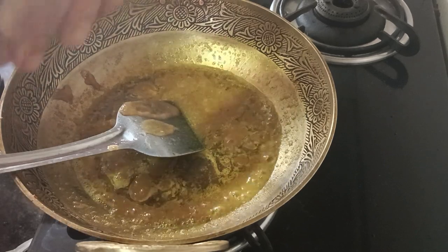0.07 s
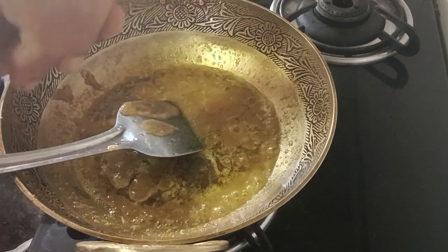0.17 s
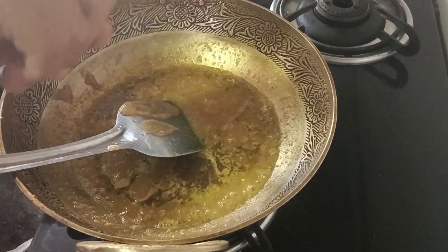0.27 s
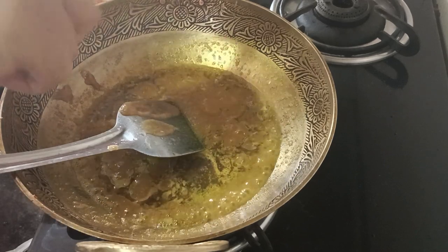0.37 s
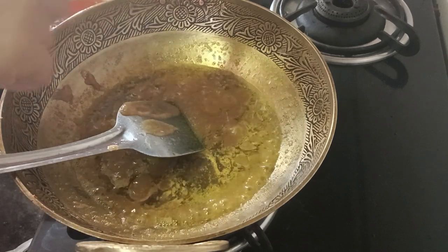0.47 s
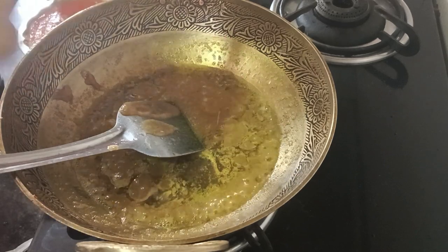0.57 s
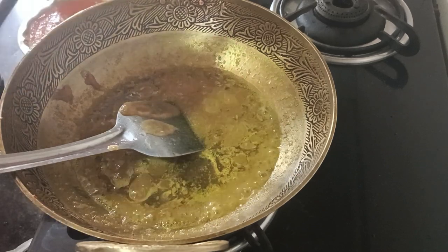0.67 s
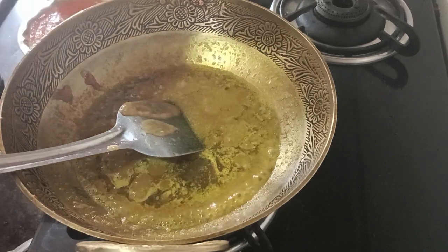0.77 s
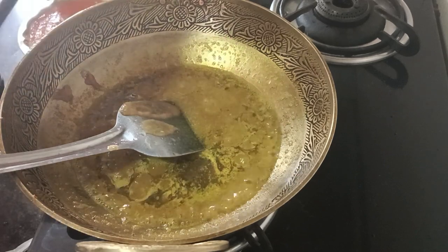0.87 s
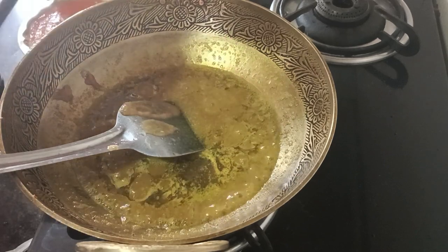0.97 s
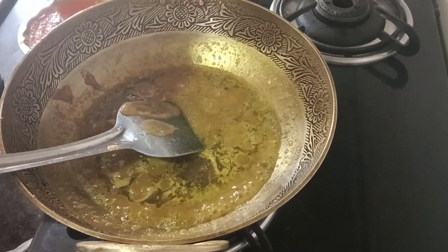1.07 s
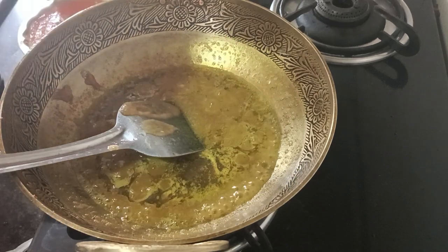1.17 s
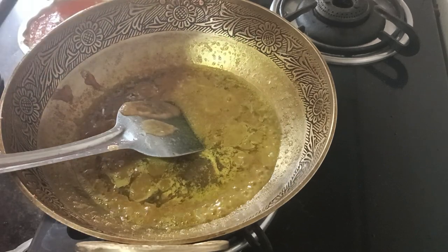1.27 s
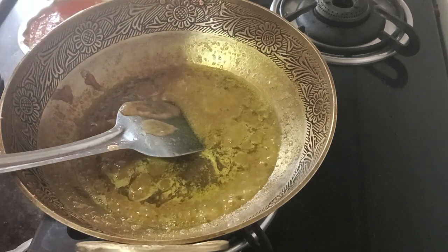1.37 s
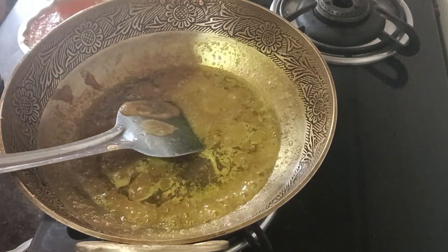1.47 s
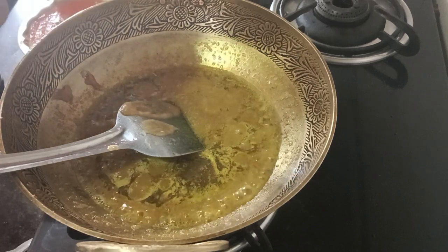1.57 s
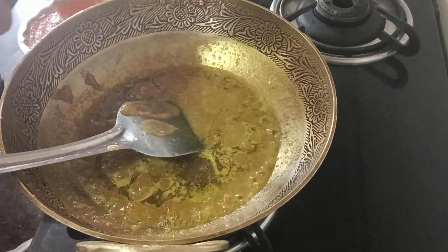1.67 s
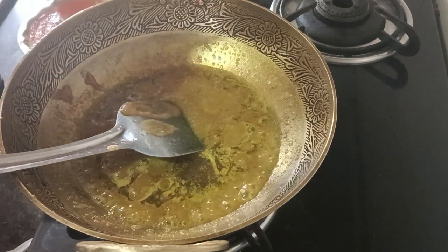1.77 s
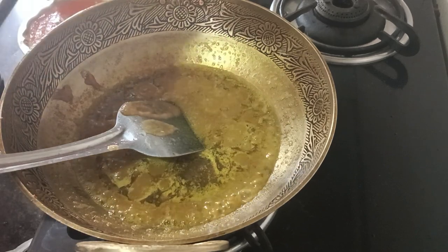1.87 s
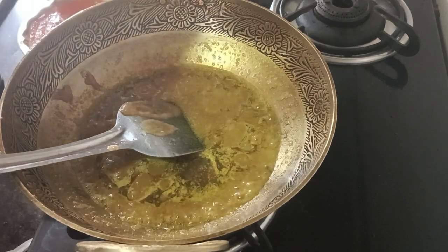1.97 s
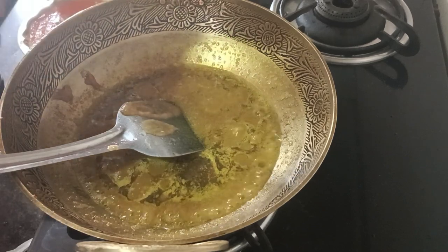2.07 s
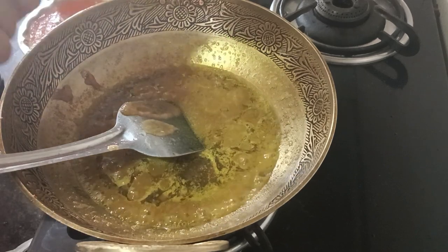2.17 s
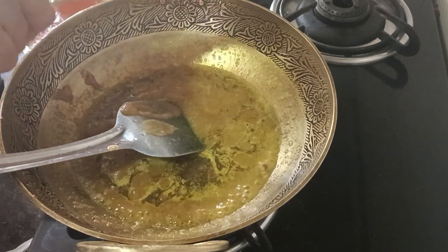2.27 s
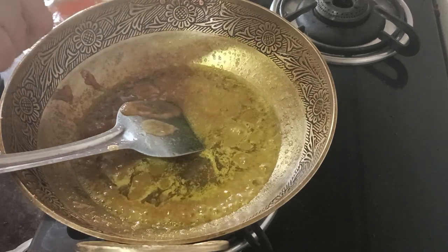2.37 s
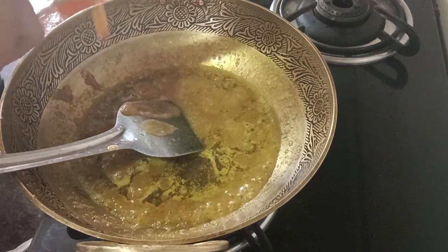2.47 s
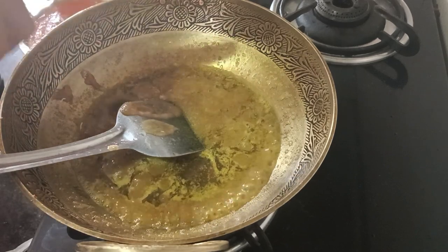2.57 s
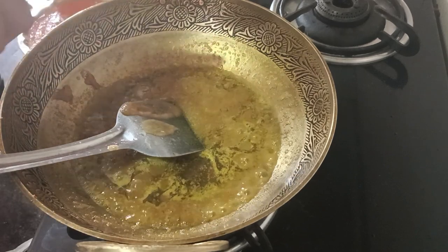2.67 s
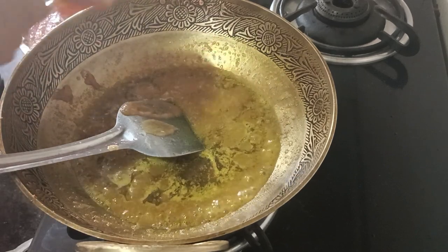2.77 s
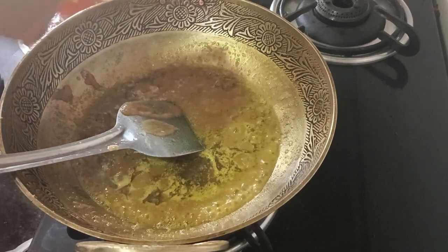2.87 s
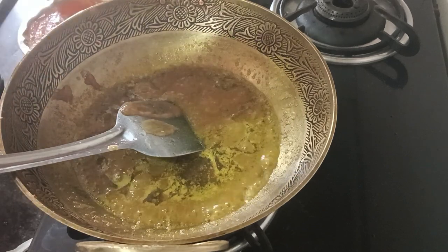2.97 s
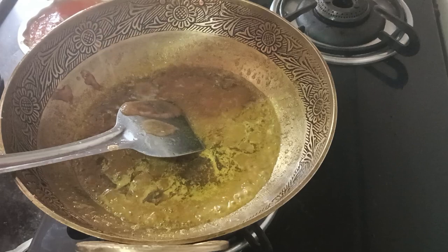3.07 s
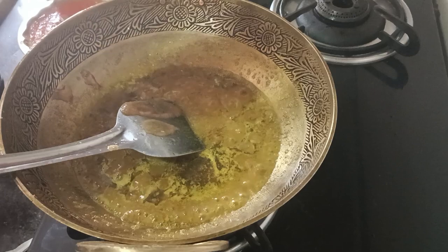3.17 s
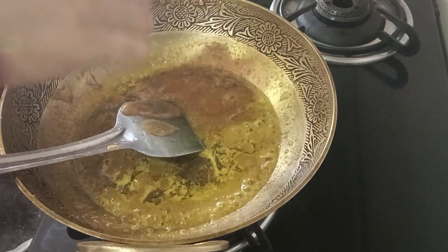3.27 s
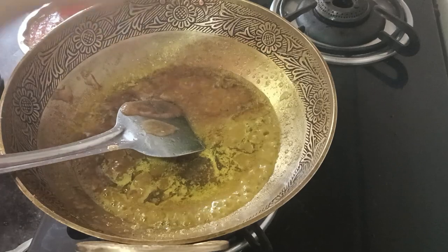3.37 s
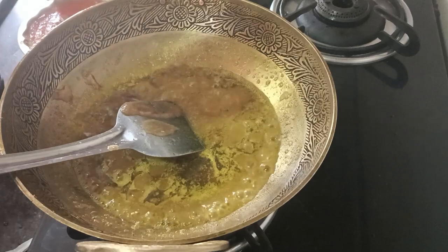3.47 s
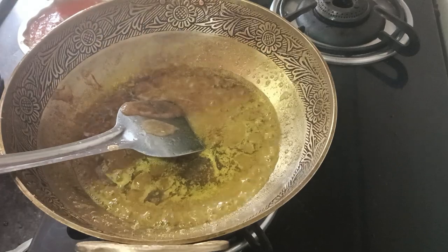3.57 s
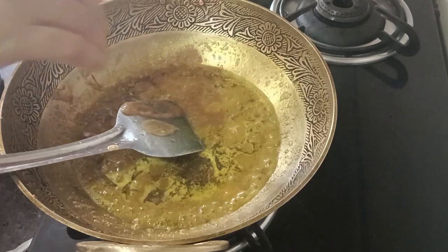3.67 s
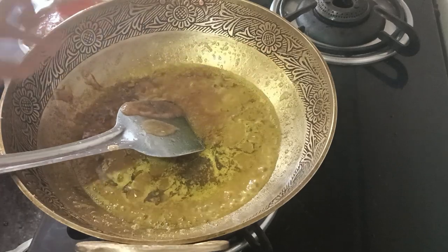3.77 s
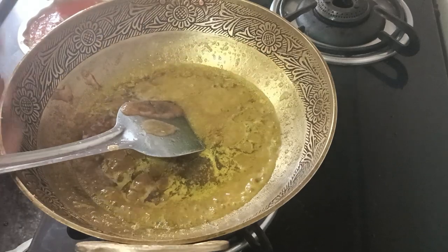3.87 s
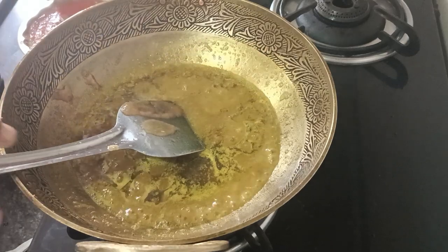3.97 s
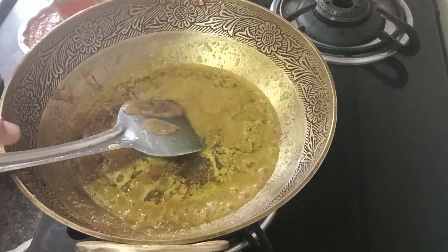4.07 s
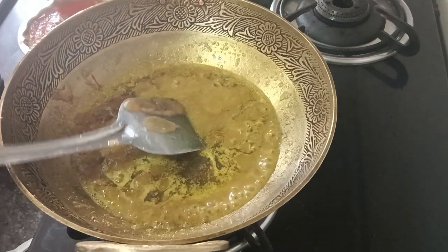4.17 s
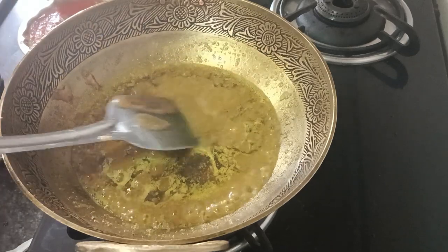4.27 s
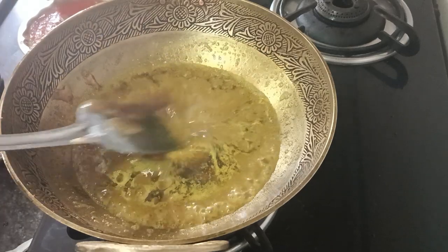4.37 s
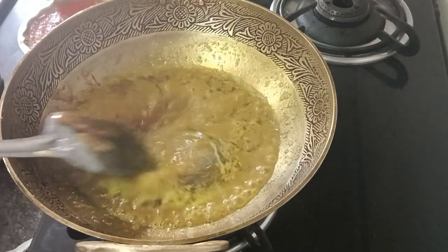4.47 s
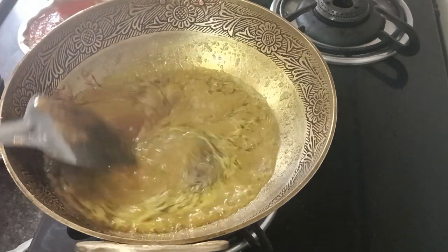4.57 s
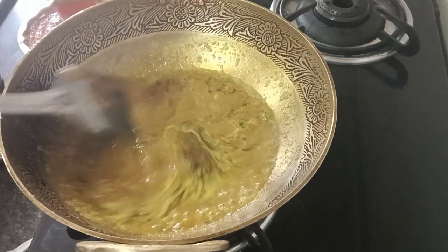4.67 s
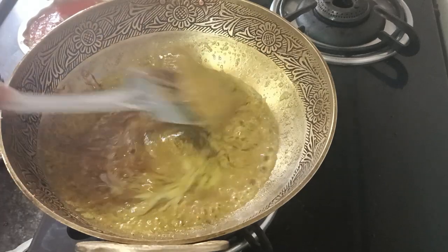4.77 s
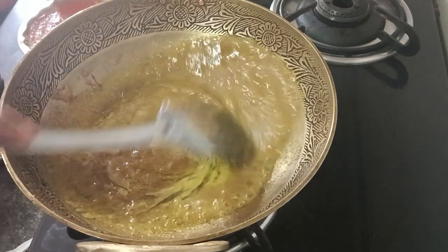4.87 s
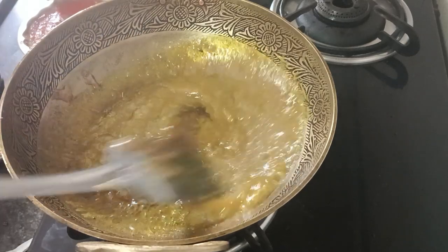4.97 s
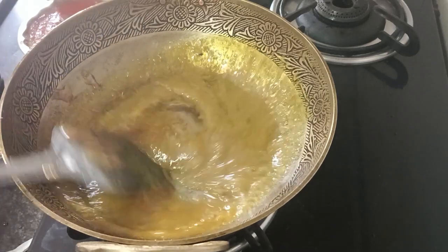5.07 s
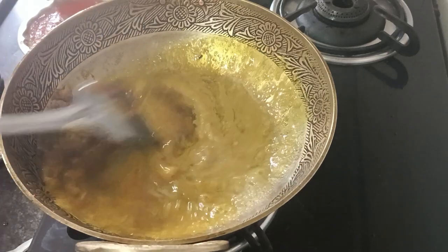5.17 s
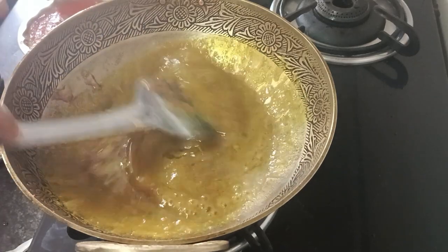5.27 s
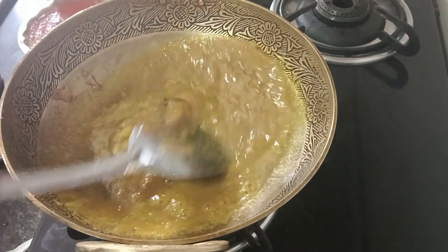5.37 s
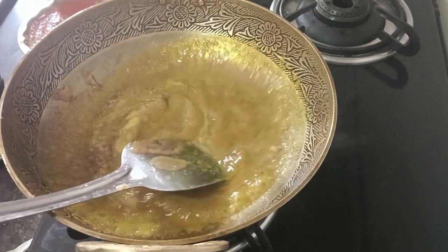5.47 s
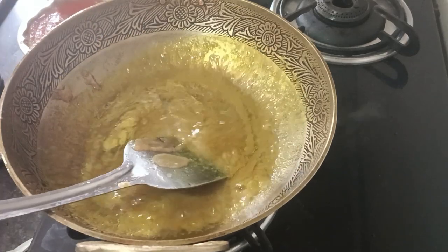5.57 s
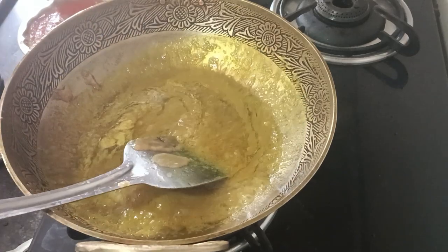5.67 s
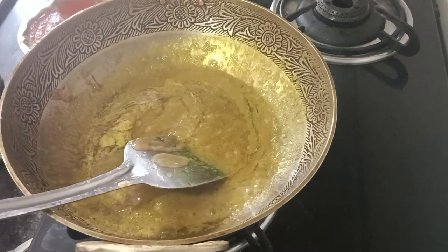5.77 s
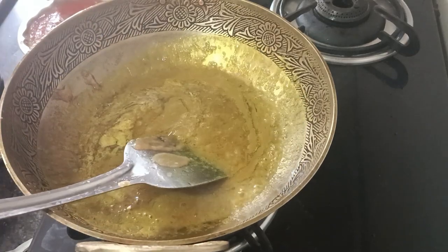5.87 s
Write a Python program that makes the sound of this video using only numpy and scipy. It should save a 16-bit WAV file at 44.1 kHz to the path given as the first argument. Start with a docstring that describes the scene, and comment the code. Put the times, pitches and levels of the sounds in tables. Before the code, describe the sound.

A phone close above a pan catches wide stereo frying: uneven bubbling crackle, sharp oil spits, rounder plops and a faint low stove boom. The heat grows gradually for over four seconds. Then stirring makes the frying surge and swish, followed by a hard steel clack with quick bounces and a fizzing hiss afterwards. Short tiled-kitchen reflections, no talking.

```python
"""Spice paste frying in a metal pan

Spice paste fries in oil in a thick metal pan over a gas flame, a phone close above it.
Steam bubbles burst on the pan floor and ring it, droplets hiss and spit, and the stove booms softly.
A ladle stirs, drags across the floor and is dropped back into the pan with a rattle.
Each source is random noise, clicks or short tones, coloured by resonances and shaped by changing levels."""
import sys
import numpy as np
from scipy import signal
from scipy.fft import rfft, irfft
from scipy.io import wavfile
from scipy.ndimage import uniform_filter1d

SR = 44100
rng = np.random.default_rng(int(sys.argv[2]) if len(sys.argv) > 2 else 0)


def dump_mix(stems):
    """Bounce the given channels to the path in sys.argv[1] as a 16-bit WAV at rate SR."""
    frames = np.atleast_2d(stems).T  # one column per channel
    limited = np.clip(frames, -1, 1)  # hard clip at full scale
    pcm = np.round(limited * 32767).astype(np.int16)
    wavfile.write(sys.argv[1], SR, pcm)


def rack_gain(trim_db):
    """Turn a fader trim in dB into the linear factor to multiply a signal by."""
    fader = np.asarray(trim_db, float)
    return 10 ** (fader / 20)


N = 261072
T = np.arange(N) / SR

# pan resonances: pitch_hz, width_hz, left_db, right_db
PAN = [(233, 11, -22, -23), (330, 16, -18, -12), (517, 206, -15, -12.5), (682, 81, -20, -16),
       (950, 450, -11, -18), (1308, 65, -12.5, -2), (1445.7, 55, -5.5, 3.5), (1590, 63, -10, -11),
       (1820, 41, -7, -3.5), (2050, 52, -1, -4), (2377, 170, -6, -0.5), (2580, 92, -3.5, -3),
       (2747, 160, 1, -1), (3175, 52, -2, 0), (3380, 160, -1, 3.5), (3780, 140, 2.5, 0.5),
       (4058, 110, -2.5, 0), (4384, 140, -5.5, -4.5), (4726, 140, -15, -2.5), (5460, 340, -8, -5.5)]


def unit(x):
    """Scale to an average (rms) strength of 1."""
    return x / np.sqrt(np.mean(x ** 2))


def walk(rate):
    """Random levels held for 1 / rate seconds, then smoothed twice; spread 1."""
    hold = int(SR / rate)
    steps = np.repeat(rng.standard_normal(N // hold + 1), hold)
    return unit(uniform_filter1d(uniform_filter1d(steps, hold), hold)[:N])


def ring(x, hz, width):
    """One damped resonance (width in Hz); white noise of strength 1 comes out at strength 1."""
    r = np.exp(-np.pi * width / SR)
    gain = np.sqrt((1 - r * r) / 2)
    return signal.lfilter([gain, 0, -gain], [1, -2 * r * np.cos(2 * np.pi * hz / SR), r * r], x)


def clicks(s, size):
    """Single-sample clicks of the given sizes (channels x events) at the given times."""
    at = np.clip((np.asarray(s) * SR).astype(int), 0, N - 1)
    return np.array([np.bincount(at, row, N) for row in size])


def pair(shape, alike):
    """Left and right random values that share a part (alike: 0 to 1)."""
    both, left, right = rng.standard_normal((3, shape))
    alike = np.clip(alike, 0, 1)
    return np.sqrt(alike) * both + np.sqrt(1 - alike) * np.array([left, right])


def burst(starts, ms):
    """Envelope that jumps at each click and falls to 1 / e in the given milliseconds."""
    return signal.lfilter([1], [1, -np.exp(-1000 / (ms * SR))], starts)


def tones(s, size, hz, cycles):
    """Short dying tones (size: channels x events) that fade to 1 / e in the given number of cycles."""
    k = np.arange(2048)
    turns = np.outer(hz, k) / SR
    onset = (1 - np.exp(-turns / .7)) ** 2
    shape = np.sin(2 * np.pi * turns) * np.exp(-turns / cycles) * onset * 2
    at = np.minimum((np.asarray(s) * SR).astype(int)[:, None] + k, N).ravel()
    return np.array([np.bincount(at, (row[:, None] * shape).ravel(), N + 1)[:N] for row in size])


def swells(start_s, length_s, db):
    """Summed power of smooth swells, each rising more slowly than it falls."""
    start_s, length_s, db = (np.reshape(v, (-1, 1)) for v in (start_s, length_s, db))
    u = (T[::64] - start_s) / length_s - 0.49  # distance from the peak, as a share of the length
    power = rack_gain(2 * db) * np.exp(-(u / np.where(u < 0, 0.42, 0.23)) ** 2)
    return np.interp(T, T[::64], power.sum(axis=0))


def over(db, power):
    """Level in dB of a background with swells on top."""
    return 10 * np.log10(rack_gain(2 * db) + power)


def surges(calm_db, centre_hz):
    """Level near one pitch, lifted where a patch of paste boils up or the ladle drags."""
    # patches boiling up: start_s, length_s, drive_db, bubble_pitch_hz
    boil_rows = [(0.0, 0.064, -51, 1400), (0.057, 0.028, -54, 8000), (0.1, 0.071, -53, 3300),
                 (0.114, 0.25, -52, 1400), (0.141, 0.055, -34, 320), (.142, 0.17, -50, 1950),
                 (0.186, 0.055, -54, 3300), (0.295, 0.12, -57, 3500), (0.523, 0.14, -54, 1400),
                 (0.505, 0.16, -53, 2550), (0.528, 0.086, -52.5, 8000), (0.74, 0.042, -52, 2550),
                 (0.833, 0.21, -52.5, 2500), (1.16, 0.07, -54, 2600), (1.367, 0.054, -53, 2550),
                 (0.526, 0.19, -53.5, 3300), (.655, 0.092, -37.5, 950), (0.744, .05, -46, 320),
                 (0.856, 0.073, -51, 1950), (0.9, 0.059, -58, 3300), (1.046, 0.042, -55, 8000),
                 (1.18, 0.072, -49, 1950), (1.307, 0.05, -51, 8000), (1.316, 0.11, -50.5, 1400),
                 (1.34, 0.18, -56.5, 3300), (1.386, 0.042, -44, 1950), (1.572, 0.052, -39, 320),
                 (1.607, 0.095, -54.5, 1400), (1.61, 0.18, -41, 950), (1.693, 0.18, -52, 1950),
                 (1.9, 0.11, -43.5, 1646), (1.937, 0.055, -54.5, 3300), (1.935, 0.047, -58, 2600),
                 (2.02, 0.06, -49.5, 8000), (2.212, 0.075, -49, 2550), (2.739, 0.066, -46, 2600),
                 (3.097, 0.063, -46.5, 2700), (2.023, 0.052, -42.5, 2990), (2.044, 0.041, -37, 950),
                 (2.23, 0.067, -53, 2000), (2.36, 0.069, -42.5, 320), (2.414, 0.044, -67, 3300),
                 (2.544, 0.11, -48, 1950), (2.56, 0.079, -48, 1400), (2.672, 0.12, -39, 950),
                 (2.678, 0.084, -46.5, 1400), (2.697, 0.041, -52, 8000), (2.728, 0.077, -62, 3300),
                 (2.833, 0.15, -52, 1950), (2.933, 0.075, -67, 3500), (3.01, 0.11, -51, 1950),
                 (3.207, 0.086, -42.5, 1645), (3.283, 0.1, -45, 1400), (3.3, 0.09, -50, 1950),
                 (3.36, 0.045, -53.5, 3300), (3.38, 0.039, -51, 8000), (3.435, 0.022, -45.5, 1400),
                 (3.477, 0.16, -46.5, 1400), (3.483, 0.18, -46.5, 1950), (3.565, 0.056, -38, 950),
                 (3.515, 0.17, -52, 3300), (3.622, 0.06, -51, 8000), (3.705, 0.18, -42.5, 1610),
                 (3.746, 0.05, -36.5, 320), (3.948, .054, -45, 1950), (3.77, 0.05, -52, 2550),
                 (3.856, 0.057, -50, 2550), (3.876, .05, -63, 3300), (4.286, 0.22, -51, 2650),
                 (4.602, 0.092, -46, 2700), (5.138, 0.2, -49, 2550), (5.18, 0.088, -51, 3600),
                 (4.15, 0.25, -55.5, 1400), (4.2, 0.22, -50, 1950), (4.365, 0.051, -51, 1950),
                 (4.722, 0.083, -50, 1950), (5.246, 0.06, -46, 2000), (4.354, 0.12, -50, 3300),
                 (4.452, 0.1, -48, 3300), (4.514, .05, -50, 8000), (4.533, 0.12, -44, 1610),
                 (4.85, 0.052, -59, 3300), (4.86, 0.06, -37, 1400), (4.91, 0.083, -36, 950),
                 (5.044, 0.056, -48, 1400), (5.083, 0.1, -37.5, 950), (5.197, 0.1, -52, 1640),
                 (5.87, 0.055, -44, 320)]
    start_s, length_s, db, hz = np.transpose(boil_rows)
    boils = swells(start_s, length_s, db - 10 * (np.log2(hz / centre_hz) / 0.28) ** 2)
    drag_s, drag_length_s, edge_s = 4.828, .098, .012
    drag_db, drag_hz, drag_octaves = -44, 2250, 2.8  # strongest near drag_hz
    pressed = np.clip(np.minimum(T - drag_s, drag_s + drag_length_s - T) / edge_s + .5, 0, 1)
    drag = pressed ** 2 * rack_gain(2 * (drag_db - 10 * (np.log2(drag_hz / centre_hz) / drag_octaves) ** 2))
    return over(calm_db, boils + drag)


def drives(sizzle_db):
    """Each bubble size follows the sizzle, wanders on its own and surges."""
    # trivet hum, simmer, slosh, big, middling, small and fine bubbles:
    # pitch_hz, level beside the sizzle_db, share of the sizzle's swings (0-1), wander_db
    drive_rows = [(295, -8, 0.058, -2.5), (567, 1, 0.024, 1.5), (950, 1, 0.023, 0.5),
                  (1400, -9.5, 0.81, 1.5), (1950, -7, 0.78, 2.5), (2550, -6, 1, 1.5), (3500, -6, 1.0, 1.5)]
    middle_db = -50  # the sizzle's swings count from here
    levels = []
    for hz, beside_db, share, wander_db in drive_rows:
        calm_db = middle_db + beside_db + share * (sizzle_db - middle_db) + wander_db * walk(18)
        levels.append(surges(calm_db, hz))
    return levels


def bubbles(drives_db):
    """Bubbles burst all over the pan floor, each ringing the resonances near its own pitch."""
    # big bubbles, before pop_db is added: time_s, peak_db, pitch_hz
    pop_rows = [(0.2073, -22.5, 4200), (0.301, -30, 3780), (0.5425, -40, 1480), (0.944, -26.5, 3370),
                (1.809, -30, 3220), (0.76, -28, 4420), (1.321, -33, 1460), (1.468, -28, 3770),
                (1.95, -23.5, 2750), (1.9735, -27, 2830), (2.409, -30, 1400), (2.933, -24, 3970),
                (2.968, -22, 3380), (3.2013, -24, 2050), (3.3455, -25.5, 1430), (3.7244, -37, 3240),
                (4.036, -24, 2740), (4.242, -24, 4180), (4.3053, -23, 2550), (4.575, -32, 1370),
                (4.6322, -19.5, 2600), (4.766, -21, 3600), (4.8314, -31, 3380), (5.045, -22, 1440)]
    # upper edges_hz of the resonances driven by trivet hum, simmer, slosh, big, middling and small
    # bubbles; fine bubbles drive those above
    drive_edges_hz = [400, 800, 1150, 1700, 2200, 2900]
    rate, spread_db, bubble_octaves, patchy_db = 4200, 1.0, 0.32, 2.5  # rate in bubbles per second
    pop_db, pop_octaves, pop_ms, oil_q = -13, 0.18, 4.2, 5.65
    s = rng.uniform(0, N / SR, int(rate * N / SR))
    size = rack_gain(spread_db * np.minimum(rng.exponential(size=len(s)), 4.5))
    bubble_hz = 170 * 2 ** (5.204 * rng.random(len(s)) ** 0.707)  # a bubble's size sets its pitch
    pop_s, peak_db, pop_hz = np.transpose(pop_rows)
    out = 0
    for hz, width, *db in PAN:
        alike = 0.22 + 190 / hz  # long waves reach both ports alike
        tuned = size * np.exp(-.5 * (np.log2(hz / bubble_hz) / bubble_octaves) ** 2)
        # patches of paste boil up and calm down over each part of the pan
        patches = rack_gain(patchy_db * min(hz / 1300, 1) ** 2 * walk(23.99))
        boil = unit(clicks(s, tuned * pair(len(s), alike))) * patches
        boil = boil * rack_gain(drives_db[np.searchsorted(drive_edges_hz, hz)])
        near = np.exp(-.5 * (np.log2(hz / pop_hz) / pop_octaves) ** 2)
        pops = burst(clicks(pop_s, [near * rack_gain(peak_db + pop_db)]), pop_ms) * pair(N, alike)
        # the oil cushions each burst: a softer start, and little sound between resonances
        push = ring(boil + pops, hz, hz / oil_q) * np.sqrt(np.pi * hz / (oil_q * SR))
        out = out + rack_gain(db)[:, None] * ring(push, hz, width)
    return out


def blips(sizzle_db):
    """Bubbles snap as their skin tears: many small ones at random, and the big ones."""
    # big bubbles whose skin snaps: time_s, level_db, pitch_hz
    snap_rows = [(0.2076, -24, 4180), (0.3009, -32, 3780), (0.7605, -30, 4400), (1.469, -33, 3770),
                 (1.809, -28, 3220), (1.95, -23.5, 2750), (1.973, -24, 2830), (2.9328, -33, 3990),
                 (2.969, -19, 3540), (3.7244, -30, 3240), (4.0365, -27, 2700), (4.2415, -26, 4000),
                 (4.766, -23, 3600)]
    per_s, cycles = 70, 1.8
    when, size, place, pitch = rng.random((int(per_s * N / SR), 4)).T
    db = sizzle_db[(when * (N - 1)).astype(int)] + 7 - 2 * np.log(1.03 - size)
    pan_db = 8 * (place - .5)
    small_size = rack_gain(db + np.array([pan_db, -pan_db]))
    small = tones(when * N / SR, small_size, 1860 * 2 ** (1.19 * pitch), cycles)
    snap_s, snap_db, snap_hz = np.transpose(snap_rows)
    return small + tones(snap_s, rack_gain(snap_db + np.array([[-1.5], [1.5]])), snap_hz, cycles)


def gurgles(sizzle_db):
    """Small rounder bubbles ring for several cycles each, the higher ones louder."""
    per_s, low_hz, octaves, tilt_db = 220, 1280, 1.8, 6
    when, size, place, pitch = rng.random((int(per_s * N / SR), 4)).T
    db = sizzle_db[(when * (N - 1)).astype(int)] - 5 - 2.5 * np.log(1.03 - size)
    db = db + tilt_db * (pitch - .5)
    pan_db = 8 * (place - .5)
    both_sizes = rack_gain(db + np.array([pan_db, -pan_db]))
    return tones(when * N / SR, both_sizes, low_hz * 2 ** (octaves * pitch), cycles=12)


def nulls(x):
    """The pan wall cancels part of the frying between its resonances."""
    # dips: pitch_hz, width_hz, share removed (0-1)
    null_rows = [(1670, 130, .75), (2220, 170, .9), (2470, 70, .6), (3010, 170, .9), (3590, 90, .6)]
    for hz, width, share in null_rows:
        x = x - np.clip(share, 0, 1) * signal.lfilter(*signal.iirpeak(hz, hz / width, fs=SR), x)
    return x


def ports(x):
    """Colour each channel as its microphone port does, with a filter that never sounds early."""
    # port response: pitch_hz, left_db, right_db
    port_rows = [(150, -25, -53), (795, -24, -25), (2430, -2, -13), (4170, 7, 6), (6140, 0, 0),
                 (7630, 2.5, 6), (8850, 0, 6), (9250, 2, -2.5), (10460, 11.5, -2), (11600, -2.5, -2.5),
                 (13900, 3, -5), (16900, -18, 7)]
    hz, *db = np.transpose(port_rows)
    log_hz = np.log(np.fft.rfftfreq(1024, 1 / SR) + 1)
    log_gain = [np.interp(log_hz, np.log(hz), d) * np.log(10) / 20 for d in db]
    # fold the cepstrum to its first half, so the filter responds as promptly as it can
    cepstrum = irfft(log_gain)
    cepstrum[:, 1:512] *= 2
    cepstrum[:, 513:] = 0
    return signal.fftconvolve(x, irfft(np.exp(rfft(cepstrum))), axes=1)[:, :N]


def flutter(top_db):
    """The denser the finest spatter, the evener the hiss: flutter halves from sparse to dense."""
    return np.interp(top_db, [-60, -50], [1, .5])


def small_spits():
    """Many lesser spits at random moments, places and pitches, as rows like the loud ones."""
    per_s = 30
    when, size, place, pitch = rng.random((int(per_s * N / SR), 4)).T
    peak_db = -40 - 2 * np.log(1.04 - size)
    return np.transpose([when * N / SR, peak_db, 14 * place - 7, 7000 * 2 ** pitch])


def spatter(hiss_db, top_db):
    """Droplets flash to steam: a hiss with ticks in it, and spits with a short fizzing tail."""
    # loud oil spits, before spit_db is added: time_s, peak_db, left minus right_db, pitch_hz
    spit_rows = [(0.066, -36, -13, 8500), (0.1451, -37, -3, 13500), (0.2064, -42, -3, 13500),
                 (0.3204, -29.5, 1, 10700), (0.6775, -34, -2, 8400), (0.6868, -32, -2, 14000),
                 (0.7715, -29, -5, 14200), (1.065, -34, 0, 10500), (1.815, -34, 5, 10600),
                 (1.871, -34, -11, 7880), (1.9704, -33, 8, 10600), (2.0266, -35, 10, 10600),
                 (2.175, -35, 4.5, 9740), (2.1949, -37, 11, 10100), (2.269, -36, 1, 10000),
                 (2.4374, -32, -3, 8860), (2.721, -32, 3.0, 10200), (2.835, -37, 3.5, 8300),
                 (2.9163, -38, -4, 13500), (2.966, -30.5, -4, 7880), (3.0854, -32, -4, 7560),
                 (3.1148, -43, 2, 13500), (3.246, -31.5, 2, 10100), (3.2824, -46, 1, 13500),
                 (3.4196, -30, 3, 10200), (3.8384, -28, 2, 10100), (3.8711, -30, -2, 13500),
                 (3.9094, -29.5, -10, 10300), (4.0816, -27.5, 0, 10200), (4.153, -41, 0, 13500),
                 (4.3112, -28.5, -4, 7480), (4.5022, -28, -1, 10300), (4.5501, -29, 6, 13500),
                 (4.6209, -40, 0, 13500), (4.7671, -32, -1, 10200), (4.9581, -32, -13, 7630),
                 (5.0696, -28, 11, 10900), (5.2914, -41, 2, 13500), (5.3986, -30, 1, 13500),
                 (5.4525, -31, 10, 9850)]
    rate, spread_db, grain_db, flicker_db = 2600, 3.2, -1.5, 1.1  # rate in ticks per second
    spit_db, tail_ms = -9.5, 1.4
    out = 0
    # coarse, middling and fine droplets come and go on their own
    droplets = (([100, 9300], hiss_db + 3.0), ([9300, 11300], hiss_db - 10.0), ([11300, 18000], top_db + 8.5))
    for edges_hz, db in droplets:
        s = rng.uniform(0, N / SR, int(rate * N / SR))
        size = rack_gain(spread_db * np.minimum(rng.exponential(size=len(s)), 5.5))
        ticks = unit(clicks(s, size * pair(len(s), 0.55)))
        band = signal.butter(3, edges_hz, "band", fs=SR, output="sos")
        hiss = signal.sosfilt(band, ports(pair(N, 0.089) + rack_gain(grain_db) * ticks))
        out = out + unit(hiss) * rack_gain(db + flicker_db * flutter(top_db) * walk(60))
    spit_s, peak_db, pan_db, spit_hz = np.vstack([spit_rows, small_spits()]).T
    for hz in (6500, 9000, 11500, 14500):
        near = np.exp(-.5 * (np.log2(hz / spit_hz) / .33) ** 2)
        starts = clicks(spit_s, near * rack_gain(peak_db + spit_db + np.array([pan_db, -pan_db]) / 2))
        out = out + ports(ring(burst(starts, tail_ms) * pair(N, .45), hz, hz / 3))
    return out


def contact_db():
    """Force of the dropped ladle: each bounce presses briefly and lets go, over a fading chatter."""
    # landing and bounces: time_s, force_db
    bounce_rows = [(5.5305, -14.5), (5.532, -17), (5.5347, -19), (5.553, -23), (5.5642, -22),
                   (5.5794, -23.5), (5.6164, -29.5), (5.641, -35.5)]
    hold_s, fade_db_per_s, chatter_db, chatter_fade_db_per_s = 0.0019, 2000, -29.5, 184
    s, force_db = np.transpose(bounce_rows)[:, :, None]
    since = T - s
    db = force_db - fade_db_per_s * np.maximum(since - hold_s, 0)
    db = np.maximum(db, chatter_db - chatter_fade_db_per_s * since[0])
    return np.where(since >= 0, db, -120).max(axis=0)


def ladle():
    """A dense run of steel-on-metal contacts at shifting spots rings ladle, trivet and pan."""
    # ladle and trivet resonances: pitch_hz, left_db, right_db, time to fade by 60 dB_s
    ladle_rows = [(231, 2, 3.5, 0.14), (315, 1, 0, 0.16), (392, -2.5, -2, 0.06), (735, -5.5, -4.5, 0.15),
                  (1020, -3, -16, 0.063), (1126, 0, 1, 0.14), (1485, -1, 5, 0.22), (1810, -7, 3, 0.13),
                  (2380, -3.5, -13, 0.27), (2865, -16, -13, .12), (3390, 7, 10, 0.076), (3300, 2, -7, 0.2),
                  (3770, 4, 5, .15), (4140, -3, -15, 0.053), (4930, -8, 10.5, 0.04), (7430, -6, 3, 0.017),
                  (8400, -28, -23, .05), (10040, 4.5, -16, 0.021), (10700, 7, -16, 0.015)]
    rate = 9000  # contacts per second
    force_db = contact_db() + 1.6 * walk(400)
    touch = rack_gain(force_db) * (rng.random(N) < rate / SR) * np.sqrt(SR / rate)
    steel = 0
    for hz, *db, t60 in ladle_rows:
        push = touch * pair(N, min(0.38 + 230 / hz, .8))
        steel = steel + rack_gain(db)[:, None] * ring(push, hz, np.log(1000) / (np.pi * t60))
    body = 0
    for hz, width, *db in PAN:
        if hz > 900:
            push = touch * pair(N, 0.066 + 220 / hz)
            body = body + rack_gain(db)[:, None] * ring(push, hz, 5.2 * width)
    # the pan knocks on its trivet
    thud = rack_gain(-34) * ring(ring(touch * pair(N, 0.81), 290, 69), 290, 138)
    crack = touch * pair(N, 0.36) * rack_gain(8 + 1.25 * force_db)  # harder contacts are brighter
    return rack_gain(-18) * steel + rack_gain(-11) * body + ports(crack) + thud


def singing():
    """A flickering tone of the ladle's bowl once it lies in the paste again."""
    start_s, rise_s, hz, width_hz = 5.6, .08, 3665, 70
    tone = ring(ring(pair(N, 0.47), hz, width_hz), hz, 4 * width_hz)
    return unit(tone) * rack_gain(-53.5 + 2.5 * walk(40)) * np.clip((T - start_s) / rise_s, 0, 1)


def stove():
    """The flame shakes two low resonances of the stove top; flame, pan and ladle rock it into thumps."""
    # thumps: start_s, length_s, boom_db, rumble_db
    thump_rows = [(0.134, 0.11, -49, -65), (0.346, 0.095, -49, -72), (0.639, 0.035, -44.5, -57),
                  (0.757, 0.056, -49, -70), (.93, 0.073, -54, -72), (1.612, 0.068, -43.5, -58),
                  (2.037, 0.043, -60.5, -75), (2.311, 0.065, -68, -55), (2.442, 0.057, -56.5, -69),
                  (2.766, 0.063, -40.5, -60), (3.027, 0.07, -54.5, -75), (3.196, 0.041, -49.5, -56),
                  (3.244, .04, -49, -50.5), (3.396, 0.077, -50, -77), (3.527, 0.033, -55, -70),
                  (3.698, 0.063, -47.5, -56), (3.863, 0.064, -50.5, -75), (4.293, 0.038, -52, -50),
                  (4.509, 0.032, -71, -47), (4.56, 0.066, -53, -53), (4.72, 0.03, -49, -65),
                  (4.768, 0.065, -38.5, -57), (4.885, 0.036, -49.5, -68), (4.984, 0.064, -51, -50),
                  (5.03, 0.085, -69, -47.5), (5.074, 0.032, -49, -49), (5.266, 0.021, -53, -52),
                  (5.308, 0.045, -68, -51), (5.383, 0.054, -39.5, -53), (5.434, 0.074, -64, -48),
                  (5.476, 0.074, -48, -48), (5.556, 0.035, -47.5, -36.5), (5.616, 0.041, -48, -43),
                  (5.694, 0.064, -56.5, -44.5)]
    start_s, length_s, *thump_db = np.transpose(thump_rows)
    boom_db, rumble_db = (over(still_db + 5 * walk(11), swells(start_s, length_s, db))
                          for still_db, db in zip((-68, -83), thump_db))
    out = 0
    for hz, db, waver in ((130.2, boom_db, .055), (77, rumble_db, .12)):
        turn = 2 * np.pi * np.cumsum(hz * (1 + waver * walk(22))) / SR  # the pitch wavers
        side = rack_gain(-14) * ring(rng.standard_normal(N), hz, 26) * [[1], [-1]]
        rough = 0.27 * ring(rng.standard_normal(N), hz, 22)
        out = out + (1.48 * np.sin(turn) + rough + side) * rack_gain(db + 2.2 * walk(24.71))
    steady = rack_gain(-61) * ring(pair(N, 1.0), 105, 69)
    deep = rack_gain(-36 + 0.62 * rumble_db) * ring(pair(N, 1.0), 35, 30)
    return out * rack_gain([[-.6], [.6]]) + steady + deep


def kitchen(x):
    """Tiles and worktop return a short diffuse tail, the same at both ports in the bass only."""
    t60, wet_db, alike_hz = 0.12, -7.5, 700  # t60: seconds to fade by 60 dB
    t = T[:SR // 2]
    mid, side = rng.standard_normal((2, len(t))) * np.exp(-np.log(1000) * t / t60) * (t > .004)
    tail = mid + signal.lfilter(*signal.butter(1, alike_hz, "high", fs=SR), side) * [[1], [-1]]
    tail = tail / np.sqrt(np.sum(tail ** 2) / 2)
    return x + rack_gain(wet_db) * signal.fftconvolve(x, tail, axes=1)[:, :N]


def scene():
    """Frying, stove and ladle in the kitchen; the left port is a little further from the pan."""
    # the heat builds and stirring bares the hot floor; levels before each layer's own offsets:
    # time_s, sizzle in the pan_db, spatter hiss_db, finest spatter_db
    fry_rows = [(0.0, -55, -53.5, -67), (0.2, -52.5, -54.5, -62), (0.43, -53.5, -54, -61.5),
                (0.6, -51.5, -54.5, -62.5), (1.2, -50, -53, -62), (1.6, -50.5, -54, -61),
                (2.0, -49.5, -54, -59.5), (2.16, -49.5, -53.5, -61), (2.6, -49, -52.5, -59.5),
                (3.14, -48.5, -53, -62), (3.55, -48, -54, -61), (4.15, -48, -53, -60.5),
                (4.5, -47.5, -52, -59.5), (4.8, -43, -47.5, -56), (5.03, -45.5, -52, -59),
                (5.1, -45, -48, -49), (5.27, -44, -44.5, -49.5), (5.4, -51, -46, -48.5),
                (5.55, -40, -47, -51), (5.68, -48.5, -46, -52), (5.92, -53.5, -44.5, -52)]
    # the sizzle dips briefly: start_s, length_s, depth_db
    lull_rows = [(0.048, 0.063, 10), (0.374, 0.057, 3), (0.468, 0.056, 5), (0.63, 0.029, 4),
                 (0.985, 0.04, 4), (1.261, 0.052, 9), (1.55, 0.048, 4), (2, 0.038, 8), (2.124, 0.068, 5),
                 (2.3, 0.15, 4), (2.79, 0.033, 6), (3.116, 0.06, 4.5), (3.69, 0.039, 5), (4.134, 0.046, 0),
                 (5, 0.092, 3), (5.353, 0.044, 2)]
    fry_s, *fry_db = np.transpose(fry_rows)
    sizzle_db, hiss_db, top_db = (np.interp(T, fry_s, db) for db in fry_db)
    spray_db = walk(70) * flutter(top_db)
    start_s, length_s, depth_db = np.transpose(lull_rows)
    lull_db = swells(start_s, length_s, 10 * np.log10(depth_db))  # the log makes the summed power the depth
    sizzle_db = sizzle_db - lull_db
    hiss_db = surges(hiss_db + spray_db - 0.29 * lull_db, 8000)
    top_db = top_db + 1.1 * spray_db - .15 * lull_db
    frying = bubbles(drives(sizzle_db)) + blips(sizzle_db) + spatter(hiss_db, top_db) + gurgles(sizzle_db)
    pan = kitchen(nulls(frying) + ladle() + singing())
    pan[0] = np.roll(pan[0], 4)  # left lags by 4 samples
    return pan + stove()


def band_limit(x):
    """A steep low-pass at the top of the band."""
    return signal.sosfilt(signal.butter(12, 16950, fs=SR, output="sos"), x)


def record(dry):
    """The phone rounds the loudest peaks, drops the deepest bass and cuts the top."""
    rounded = np.tanh(1.7 * dry) / 1.938
    bass_cut = signal.butter(2, 45, "high", fs=SR, output="sos")
    top_cut = signal.ellip(10, .2, 40, 15950, fs=SR, output="sos")
    mix = signal.sosfilt(np.vstack([bass_cut, top_cut]), rounded)
    return band_limit(mix)


dry = scene()
out = record(dry)
dump_mix(out)
```